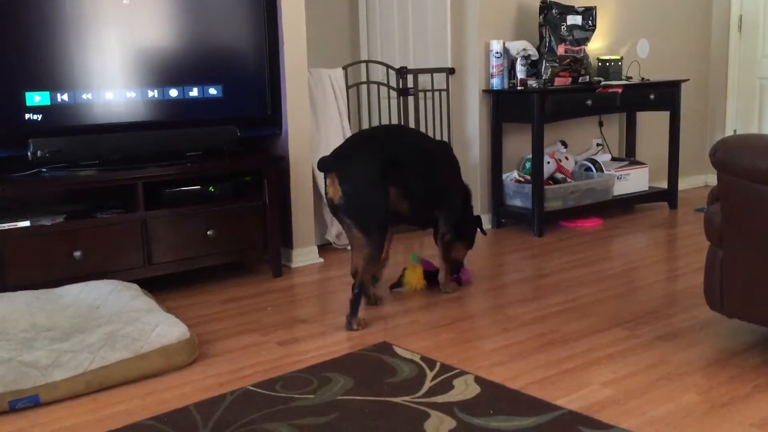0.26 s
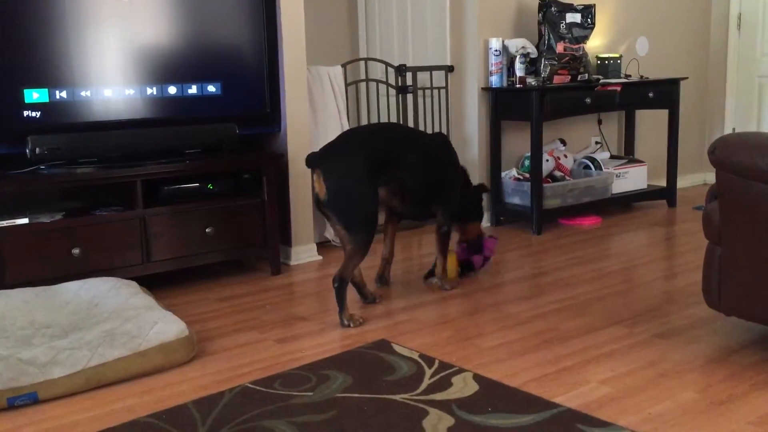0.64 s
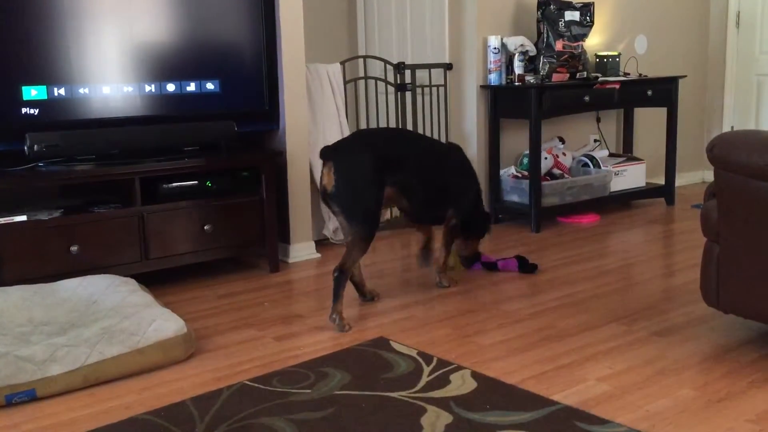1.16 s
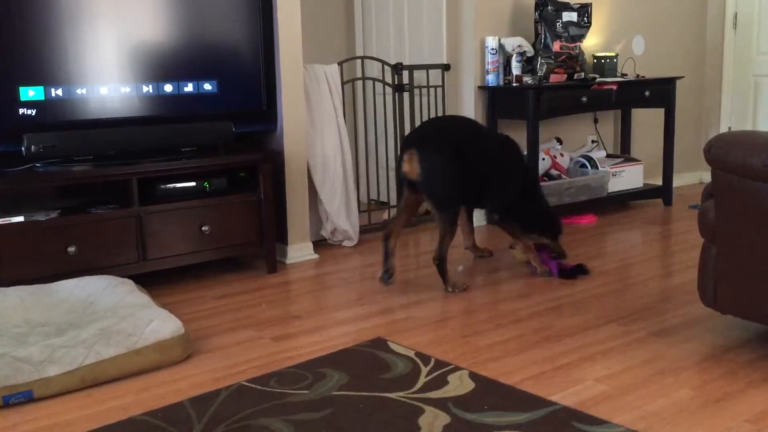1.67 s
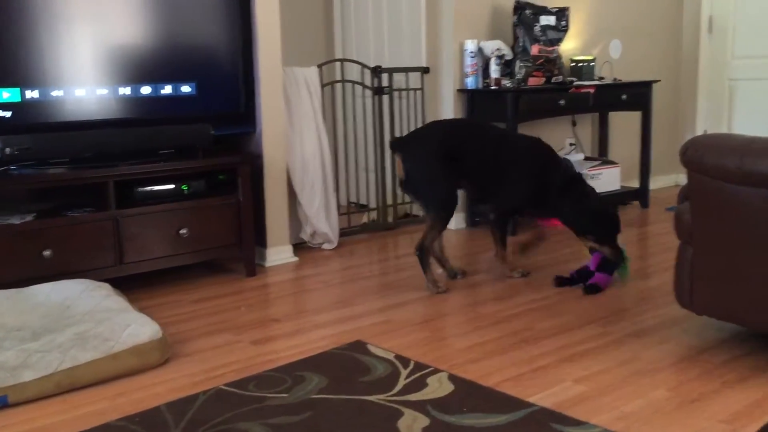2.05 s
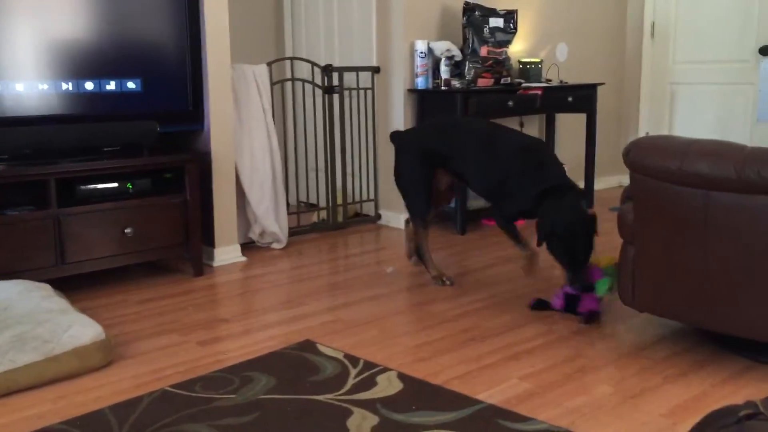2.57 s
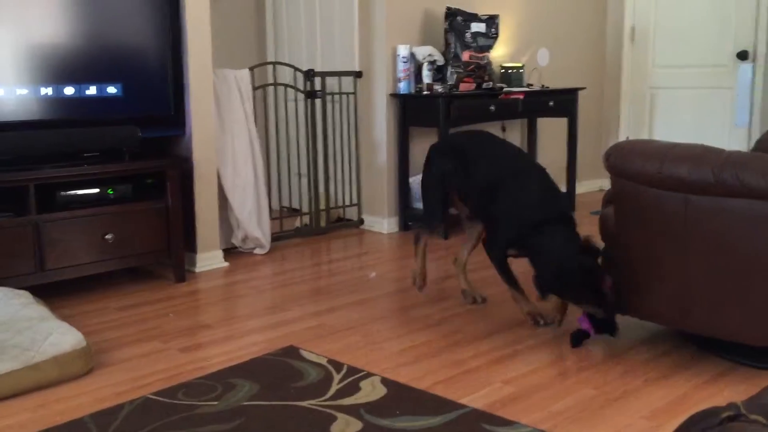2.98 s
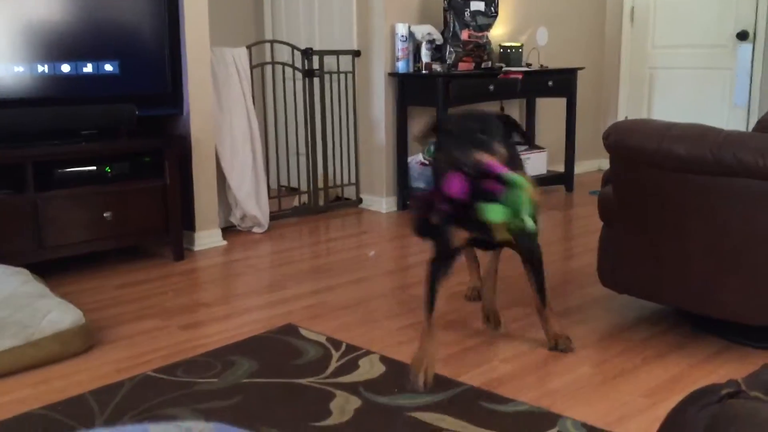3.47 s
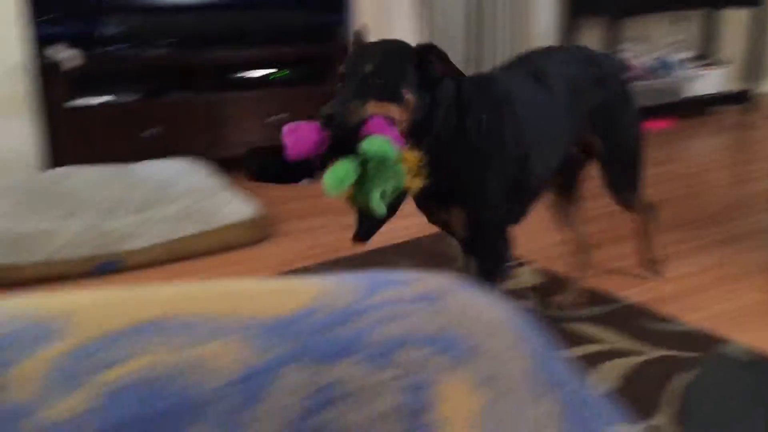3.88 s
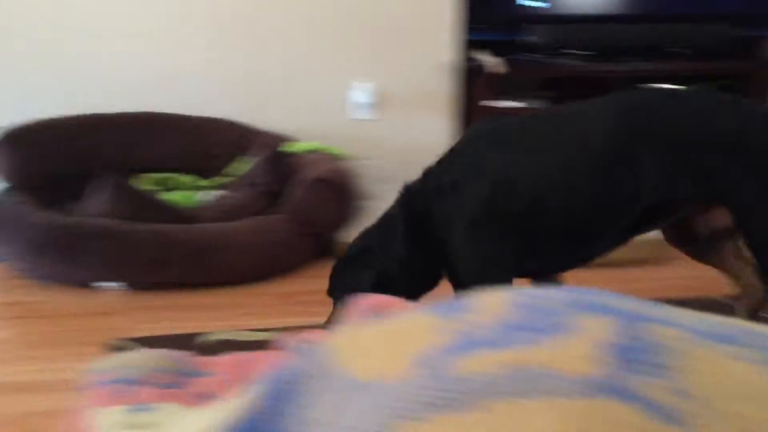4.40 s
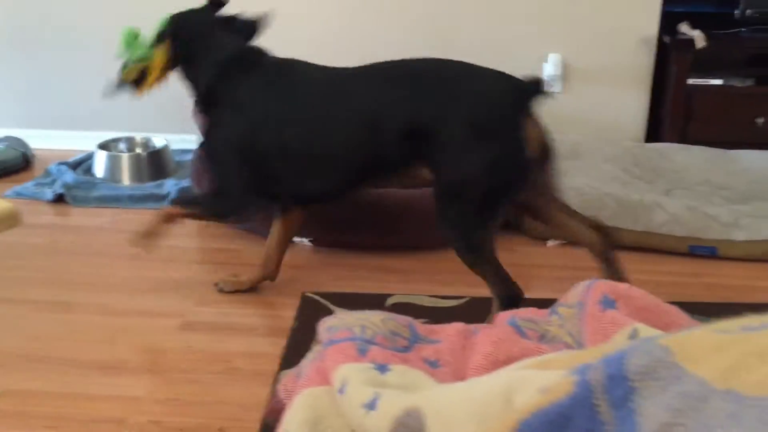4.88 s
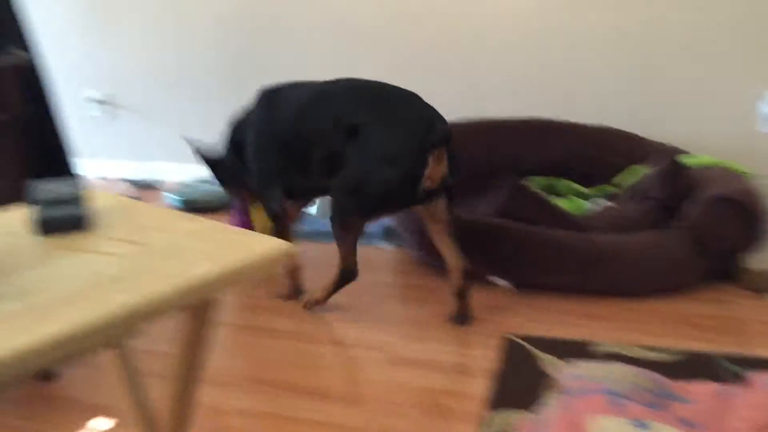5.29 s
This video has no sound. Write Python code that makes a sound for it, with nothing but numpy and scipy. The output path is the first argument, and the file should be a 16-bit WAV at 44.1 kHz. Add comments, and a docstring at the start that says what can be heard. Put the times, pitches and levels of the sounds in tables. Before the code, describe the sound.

Quiet indoor room air with a low rumble. Dog claws tick and clack irregularly on hollow wooden boards, paws thump dully, feet skid in tiny scratches and plush fabric drags. Several tiny squeezed-toy squeaks come mid-way, each a fraction of a second, some clear and some hoarse. Footfalls get heavier and drier nearby, then a close scramble, rub and hollow knock finish it. No speech.

```python
"""A living room with a laminate floor: a large dog worries a squeaky plush toy, then trots closer with it.
Squeezes buzz the toy's reed as a stack of frayed overtones whose pitch and level arch with the pressure.
Claws tick and send chirping clacks through the boards; paws and body weight ring damped floor modes.
Skidding feet and dragged plush are filtered grains of friction. A half-second reverberation answers
all but one hollow knock, over quiet room air and a low rumble."""
import sys
import numpy as np
from scipy import signal
from scipy.fft import rfft, irfft, next_fast_len
from scipy.io import wavfile
from scipy.ndimage import map_coordinates

SR = 44100
rng = np.random.default_rng(int(sys.argv[2]) if len(sys.argv) > 2 else 0)


def to_wav(s):
    """Save 16-bit WAV."""
    ch = np.atleast_2d(s).T  # columns
    pcm = np.round(np.clip(ch, -1, 1) * 32767)  # PCM
    wavfile.write(sys.argv[1], SR, pcm.astype(np.int16))


N = 244314
TIME = np.arange(N) / SR

# Spectrum of sliding feet, also lent to the air leaking past the reed.
# Each row: frequency in Hz, level in dB.
SKID_COLOUR = [(300, -0.5), (700, 14), (1000, 4), (1500, 5.5), (2400, -7), (3300, 3), (4100, 3), (5100, -8),
               (6500, -10), (16000, -36)]


def undb(db):
    """Decibels to gain."""
    return 10 ** (np.asarray(db) / 20)


def unit(x):
    """Scale to rms 1."""
    return x / np.sqrt(np.mean(x ** 2))


def at_hz(points, hz):
    """Read (Hz, value) points on a log-frequency axis."""
    f, value = np.transpose(points)
    return np.interp(np.log(np.maximum(hz, 1)), np.log(f), value)


def colour(x, points, tilt_db=0):
    """Minimum-phase filter with the given spectrum, tilted in dB per octave about its middle point."""
    size = next_fast_len(len(x) + 4096)
    hz = np.clip(np.abs(np.fft.fftfreq(size, 1 / SR)), points[0][0], points[-1][0])
    middle_hz = points[len(points) // 2][0]
    level_db = at_hz(points, hz) + tilt_db * np.log2(hz / middle_hz)
    # folding the cepstrum forward makes the filter causal
    cepstrum = np.fft.ifft(np.log(undb(level_db))).real
    cepstrum[1:size // 2] *= 2
    cepstrum[size // 2 + 1:] = 0
    response = np.exp(np.fft.fft(cepstrum))
    return np.fft.ifft(np.fft.fft(x, size) * response).real[:len(x)]


def fade(t, t60):
    """Exponential decay, 60 dB in t60 seconds."""
    return np.exp(-np.log(1000) * t / t60)


def wander(size, rate):
    """Random motion with a spread near 1: straight lines between rate random points a second."""
    steps = np.arange(size) / SR * rate
    count = int(steps[-1]) + 2
    return np.interp(steps, np.arange(count), rng.standard_normal(count))


def add(out, s, x):
    """Mix x into out from time s on."""
    i = max(int(s * SR), 0)
    out[i:i + len(x)] += x[:max(N - i, 0)]


def grains(size, density, spread_db):
    """Tiny slips of uneven size, on average density of them a second."""
    slips = rng.random(size) < density / SR
    return slips * rng.standard_normal(size) * undb(spread_db * rng.standard_normal(size))


def blow(points, modes, crack_db, contact_s, detune):
    """A short rough contact plus the modes it sets ringing, detuned afresh at every spot; peak 1."""
    t = np.arange(SR // 5) / SR
    push = rng.choice([-1, 1], len(t)) * t / contact_s * np.exp(-t / contact_s)
    crack = unit(colour(push, points))
    swell = 1 - np.exp(-t / contact_s)
    ring = 0
    for hz, t60, db in modes:
        spot_hz = hz * (1 + detune * rng.standard_normal())
        ring = ring + undb(db) * unit(swell * fade(t, t60) * np.sin(2 * np.pi * spot_hz * t))
    hit = undb(crack_db) * crack + unit(ring)
    return hit / np.abs(hit).max()


def squeak(rise_s, fall_s, top_hz, scoop_semitones, drop_semitones, db, muffle_db,
           fundamental_db, top_db, rasp_db):
    """The reed buzzes under the jaws; pitch and level arch with pressure, turbulence frays each overtone."""
    # Overtones as they leave the squeaker shell. Each row: frequency in Hz, level in dB.
    shell = [(1500, 2), (2200, -5.5), (2800, -8), (3400, -7.5), (4400, -9), (5900, -5.5), (7200, -15),
             (10500, -24), (15500, -36.5)]
    tighten_power, let_go_power = 3.3, 2.386  # bend of the pitch curve before and after the tightest point
    db_per_semitone = 3  # a weak squeeze is flat and also quiet
    reed_start_s = 0.0032  # the reed takes this long to start and to stop
    jitter, hoarse = 0.0047, 0.04  # relative pitch unsteadiness, steady part and rasping part
    flutter_db, beam_hz = 4.0, 12000  # level wander of each overtone; where top_db takes hold
    leak_db, leak_tilt_db = -28.5, 6  # hissing air against the tone, and its brightness per octave

    t = np.arange(-rise_s, fall_s, 1 / SR)  # zero at the tightest point
    scoop = scoop_semitones * (np.maximum(-t, 0) / rise_s) ** tighten_power
    drop = drop_semitones * (np.maximum(t, 0) / fall_s) ** let_go_power
    flat = scoop + drop
    arch = top_hz * 2 ** (-flat / 12)
    # a rasping reed also stumbles in pitch
    pitch = arch * (1 + (jitter + hoarse * undb(rasp_db)) * wander(len(t), 500))
    phase = 2 * np.pi * np.cumsum(pitch) / SR

    tone = 0
    for k in range(1, 15):
        beamed_db = top_db / (1 + (beam_hz / (k * pitch)) ** 6)  # only the highest overtones are directional
        plush_db = fundamental_db if k == 1 else muffle_db * np.log2(k)
        flutter = flutter_db * wander(len(t), 138.0)
        gain = undb(at_hz(shell, k * pitch) + plush_db + beamed_db + flutter)
        turbulence = wander(len(t), 800) + 1j * wander(len(t), 800)
        fray = undb(rasp_db) * np.sqrt(k) * turbulence
        tone = tone + gain * np.imag((1 + fray) * np.exp(1j * k * phase))

    hiss = colour(rng.standard_normal(len(t)), SKID_COLOUR, leak_tilt_db)
    leak = undb(leak_db) * unit(hiss)
    level = undb(db - db_per_semitone * flat)
    on_off = signal.windows.tukey(len(t), 2 * reed_start_s / (rise_s + fall_s))
    return (unit(tone) + leak) * level * on_off


def claws():
    """Each claw ticks and flexes the board into a clack whose lower bending waves lag; returns both."""
    # Single claws striking. Each row: time in seconds, peak of the board's clack in dB,
    # peak of the claw's own tick in dB.
    strikes = [(0.9019, -38, -44.5), (.925, -45.5, -47), (1.135, -40, -42.5), (1.5382, -29.5, -35),
               (1.5459, -25, -31), (1.5581, -19.5, -27), (1.562, -24, -19.5), (1.7582, -26.5, -31),
               (2.085, -29.5, -50), (2.57, -21, -27), (2.583, -18, -25), (2.588, -21.5, -20),
               (2.784, -35.5, -43), (3.044, -29, -40), (3.053, -31, -34.5), (3.327, -25, -23),
               (3.344, -27, -20.5), (4.927, -34, -34), (5.194, -40, -42), (5.2102, -30, -24),
               (5.2196, -26, -18.5), (5.2355, -21, -13), (5.2383, -25, -16.5), (5.423, -34, -32),
               (5.4305, -25.5, -25.5), (5.4879, -23, -17.5), (5.491, -19.5, -18.5), (5.515, -21, -31)]
    # Spectrum of the tick. Each row: frequency in Hz, level in dB.
    tick_colour = [(300, -16), (700, 1), (2400, 1.5), (6500, 4), (12000, -8), (16000, -18.5)]
    # Spectrum of the bending waves before each spot shifts it. Each row: frequency in Hz, level in dB.
    bend_colour = [(250, -61), (750, -2), (2400, -13.5), (3400, 7), (4100, 7.5), (5300, -6), (8000, -26)]
    bend_s, bend_hz = .0016, 4000  # travel time of waves at this pitch; other delays are relative to it
    contact_s, detune = 0.00069, 0.048  # decay of the tick's contact noise; spread of the spots' pitch

    clacks, ticks = np.zeros(N), np.zeros(N)
    t = np.arange(-1024, 1024) / SR  # zero at the strike
    hz = np.fft.rfftfreq(len(t), 1 / SR)
    # delay grows as pitch falls, so each clack is a tiny falling chirp
    cycles = bend_s * (2 * np.sqrt(hz * bend_hz) - hz) - t[0] * hz
    for s, clack_db, tick_db in strikes:
        spot = np.exp(detune * rng.standard_normal())
        clack = irfft(undb(at_hz(bend_colour, hz * spot)) * np.exp(-2j * np.pi * cycles))
        contact = rng.choice([-1, 1], len(t)) * np.exp(-np.abs(t) / contact_s)
        tick = colour(contact, tick_colour)
        add(clacks, s + t[0], undb(clack_db) * clack / np.abs(clack).max())
        add(ticks, s + t[0], undb(tick_db) * tick / np.abs(tick).max())
    return clacks, ticks


def paws():
    """Pads thump the hollow boards, heel then softer toes, and scuff; the dog's weight flexes the floor."""
    # Paws landing. Each row: time in seconds, peak of the heel's blow in dB, dull thud against ring in dB,
    # rms level of the scuff in dB before its fades.
    steps = [(0.014, -45.5, -2, -50.5), (.125, -48, 7, -58), (1.409, -39, -7, -78), (1.56, -37, -14, -66),
             (2.3433, -27.5, 2.5, -42.5), (2.975, -40, 1, -55), (2.992, -37, -19, -58),
             (3.6534, -27, -6, -53), (3.748, -39, -1, -78), (4.38, -45, -10, -54.5), (4.66, -41, -5, -56),
             (4.859, -31, -16, -42), (4.925, -29, -5, -48), (5.423, -25.5, -4.5, -65)]
    # Spectrum of a soft pad's contact. Each row: frequency in Hz, level in dB.
    pad_colour = [(40, -60), (200, -9), (380, 2), (1000, -7), (1500, -14.5), (3000, -21), (8000, -61)]
    # Floating floorboards. Each row: frequency in Hz before detuning, t60 in seconds, level in dB.
    board_modes = [(396, 0.08, -10), (624.6, 0.074, 5.5), (709, 0.22, -1)]
    # The dog's whole weight coming down. Each row: time in seconds, peak in dB.
    landings = [(.085, -50), (.96, -55), (1.279, -59), (2.391, -46.5), (2.735, -48.5), (2.885, -50.5),
                (4.315, -48.5), (4.611, -41), (4.7, -47), (4.86, -34.5), (4.931, -41), (5.159, -45)]
    # The floor flexing under it. Each row: frequency in Hz before detuning, t60 in seconds, level in dB.
    floor_modes = [(79, 0.31, -5.5), (131.4, 0.14, -1), (218, 0.099, -4.5), (296, 0.028, -1)]
    roll_s, roll_db = 0.024, -10  # the paw rolls from heel pad onto toe pads
    scuff_t60_s = 0.43

    out, t = np.zeros(N), np.arange(SR // 4) / SR
    for s, db, thud_db, scuff_db in steps:
        for delay, drop_db, softness in ((0, 0, 1), (roll_s, roll_db, 2)):
            thump = blow(pad_colour, board_modes, thud_db, contact_s=0.0023 * softness, detune=0.0804)
            add(out, s + delay, undb(db + drop_db) * thump)
        slips = grains(len(t), density=600, spread_db=3)
        scuff = undb(scuff_db) * unit(colour(slips, pad_colour))
        add(out, s, scuff * np.minimum(t / roll_s, 1) * fade(t, scuff_t60_s))
    for s, db in landings:
        landing = blow(pad_colour, floor_modes, crack_db=-8.5, contact_s=0.0079, detune=0.197)
        add(out, s, undb(db) * landing)
    return out


def knock(tail_db=-13, tail_t60=0.93):
    """As the dog lunges down, one hollow resonance swells, is damped at once and hums on unevenly."""
    # One knock: start in seconds, length of the swell in seconds, pitch in Hz, level of the swell in dB.
    lunge = (5.4308, .021, 605, -16.7)
    s, length, hz, db = lunge
    t = np.arange(SR // 2) / SR
    waver = np.exp(1j * wander(len(t), 130)) * (1 + .5 * wander(len(t), 150))  # in phase and in level
    swell = np.sin(np.pi * np.minimum(t / length, 1))
    hum = np.minimum(t / length, 1) * fade(t, tail_t60) * waver
    out = np.zeros(N)
    add(out, s, undb(db) * np.imag((swell + undb(tail_db) * hum) * np.exp(2j * np.pi * hz * t)))
    return out


def skids(detune=0.026):
    """Feet slide in short crackling strokes, each over a different spot of the floor."""
    # Pads and claws skidding. Each row: start in seconds, length in seconds, rms level in dB,
    # brightness in dB per octave.
    strokes = [(0.438, 0.08, -46.5, 2.5), (1.041, 0.16, -65, 6.5), (1.397, 0.088, -56, 11),
               (1.682, 0.09, -59, 9.5), (1.769, 0.029, -46.5, 6), (1.82, 0.24, -60.5, 9),
               (2.341, 0.041, -53, 7), (2.489, 0.084, -51.5, 7), (2.791, 0.068, -58.5, 9.5),
               (2.962, 0.082, -50.5, 2.5), (3.048, 0.031, -46, 3.5), (3.243, 0.11, -46.5, 3),
               (3.32, 0.099, -43, 4), (3.623, 0.067, -48.5, 8.5), (5.488, 0.074, -52, 5),
               (0.319, 0.15, -70.5, 12.5)]
    out = np.zeros(N)
    for s, length, db, tilt_db in strokes:
        size = int(length * SR)
        slips = grains(size, density=5000, spread_db=2)
        spot = np.array(SKID_COLOUR) * [np.exp(detune * rng.standard_normal()), 1]  # shifts only the Hz
        stroke = colour(slips, spot, tilt_db) * signal.windows.tukey(size, .5)
        add(out, s, undb(db) * unit(stroke))
    return out


def drag(patchy_db=3, glide=0.09):
    """Plush rubs in uneven catches, its colour sliding with its speed; each tug builds up and dies away."""
    # Tugs that drag or shake the plush. Each row: time of the hardest pull in seconds,
    # build-up in seconds, level in dB before the patchiness.
    tugs = [(.035, 0.084, -58), (0.945, 0.032, -56.5), (1.06, 0.03, -60), (1.159, 0.083, -60),
            (1.64, 0.19, -55.5), (1.991, 0.11, -48.5), (2.101, 0.068, -49), (2.85, 0.088, -54.5),
            (3.7, 0.34, -52), (4.42, 0.058, -51.5), (4.68, 0.2, -54.5), (4.96, 0.089, -48.5),
            (5.48, 0.05, -38.5)]
    # Spectrum of the rub at normal speed. Each row: frequency in Hz, level in dB.
    plush_colour = [(60, -7), (250, 0), (400, -4), (750, 10.5), (950, 1), (1600, 4), (2400, -7.5),
                    (4000, -17), (16000, -36.5)]
    tug_t60_s, rub_db = 0.48, -67.5  # decay of a tug; faint rubbing between tugs

    pull = undb(rub_db)
    for s, build_s, db in tugs:
        build = np.exp(-(np.minimum(TIME - s, 0) / build_s) ** 2)
        tug = undb(db) * build * fade(np.maximum(TIME - s, 0), tug_t60_s)
        pull = np.hypot(pull, tug)
    fibres = colour(grains(N, density=5000, spread_db=2), plush_colour)
    travel = np.cumsum(np.exp(glide * wander(N, 20)))  # reading position, at a wandering speed
    rub = unit(map_coordinates(fibres, [travel], mode="mirror"))
    return rub * pull * undb(patchy_db * wander(N, 50))


def room(x, build_s=0.0028, lumpy_db=5):
    """Separate early reflections thicken into a tail of bands, the highest treble dying first."""
    # Reverberation bands. Each row: centre in Hz, t60 in seconds, level against the other bands in dB.
    bands = [(97, 0.55, 2.5), (512, 0.46, -6), (1560, 0.59, -2.5), (2600, 0.6, -3.5), (4100, 0.53, 0),
             (7400, 0.48, -3.5), (15400, 0.26, 2.5)]
    t = np.arange(SR) / SR
    echoes = rng.standard_normal(SR) * undb(lumpy_db * rng.standard_normal(SR) * fade(t, 1.0))
    spectrum = rfft(echoes * np.minimum(t / build_s, 1))
    hz = np.arange(SR // 2 + 1)
    centres, t60s, dbs = np.transpose(bands)
    tail = 0
    for band, t60 in zip(np.diag(undb(dbs)), t60s):  # each band peaks at its centre, zero at the others
        weight = at_hz(np.c_[centres, band], hz)
        tail = tail + irfft(spectrum * weight, SR) * fade(t, t60)
    return signal.fftconvolve(x, unit(tail) / np.sqrt(SR))[:N]


def air(air_db=-63.5, rumble_db=-64, rumble_hz=57):
    """Room air as coloured noise, over two low sines an octave apart that waver in level."""
    # Spectrum of the room air. Each row: frequency in Hz, level in dB.
    air_colour = [(20, -37), (55, 0), (120, 3.5), (650, -12.5), (1000, -23), (2000, -13), (16000, -30)]
    # The rumble eases. Each row: time in seconds, change to its level in dB.
    easing = [(2.1, 6), (3.5, -9.5)]
    hiss = unit(colour(rng.standard_normal(N), air_colour)) * undb(air_db)
    rumble = 0
    for k in (1, 2):
        rumble = rumble + wander(N, 21.04) * np.sin(2 * np.pi * k * rumble_hz * TIME) / k
    return hiss + undb(rumble_db + np.interp(TIME, *np.transpose(easing))) * rumble


def scene(clack_room_db=3, tick_room_db=8, paw_room_db=-2, rub_room_db=-2):
    """All sources mixed, each but the knock with its own share of the room."""
    # Squeezes; a bite may blow two reeds or shift its grip. Each row: start in seconds,
    # tightening in seconds, letting go in seconds, top pitch in Hz before jitter, flatness at the start
    # in semitones, final pitch drop in semitones, level at the tightest point in dB, tilt by the plush
    # in dB per octave, fundamental's extra level in dB, top treble's extra level as the reed faces us
    # in dB, rasp in dB, room send in dB.
    squeezes = [ (2.138, 0.074, 0.043, 1146, 4.5, 3.7, -37, -3, -1.5, 9, -15, 1.5),
                (2.167, 0.028, 0.051, 1039, 1.54, 2.15, -35.5, -4.5, -12, -28, -11, -8),
                (3.28, 0.0092, 0.032, 1442, 0.61, 3.2, -22, 5, 3.5, -13, -30, -4),
                (3.459, 0.017, 0.042, 1113, 0.83, 4.5, -33.5, -1.5, -2.5, 15, -12.5, 1.5),
                (3.866, 0.054, 0.034, 1564, 3.8, 4.2, -24, 6.5, 7, -23, -25.5, -2),
                (4.036, 0.028, 0.0159, 1148, 1.03, 0.55, -31, -4.5, -1, 27, -22.5, 0.5),
                (4.075, 0.014, 0.046, 1253, 1.6, 4.1, -29.5, -9.5, -7.5, 28, -21.5, 3.5),
                (4.478, 0.015, 0.015, 1291, 0.93, 2, -41, -5, -9, -22, -22, 2.5), ]
    # Claws stand out from the room as the dog comes closer.
    # Each row: time in seconds, change to the claws' room sends in dB.
    claw_room = [(2.6, -2), (4.9, -6)]

    clacks, ticks = claws()
    thumps = paws()
    rubs = skids() + drag()
    direct = clacks + ticks + thumps + knock() + rubs
    far = undb(np.interp(TIME, *np.transpose(claw_room)))
    send = far * (undb(clack_room_db) * clacks + undb(tick_room_db) * ticks)
    send = send + undb(paw_room_db) * thumps + undb(rub_room_db) * rubs
    for s, *squeeze, room_db in squeezes:
        voice = squeak(*squeeze)
        add(direct, s, voice)
        add(send, s, undb(room_db) * voice)
    return (direct + room(send) + air())[None]


def record(dry):
    """A steep elliptic low-pass cuts the top above 16 kHz."""
    low_pass = signal.ellip(8, .2, 70, 16000, fs=SR, output="sos")  # order, ripple dB, stop-band dB, Hz
    return signal.sosfilt(low_pass, dry)


dry = scene()
out = record(dry)
to_wav(out)
```